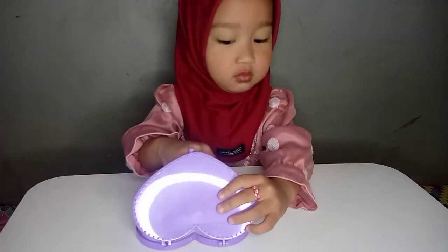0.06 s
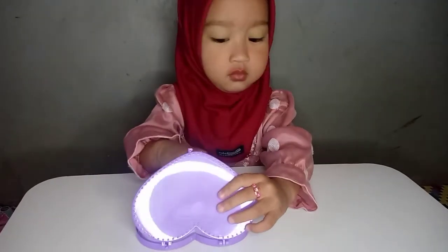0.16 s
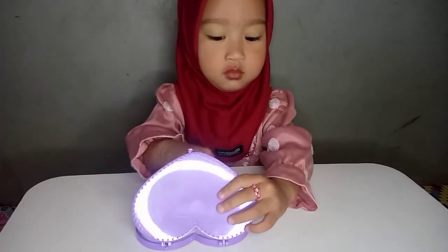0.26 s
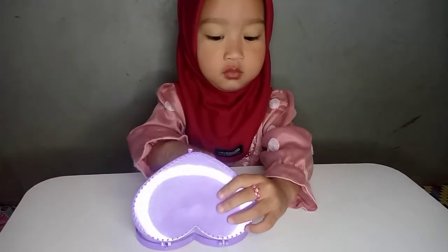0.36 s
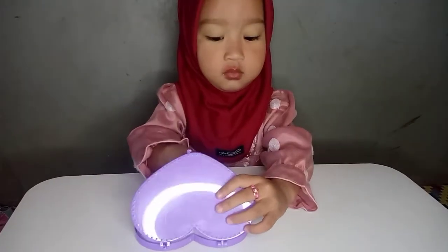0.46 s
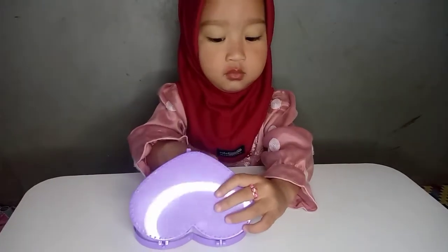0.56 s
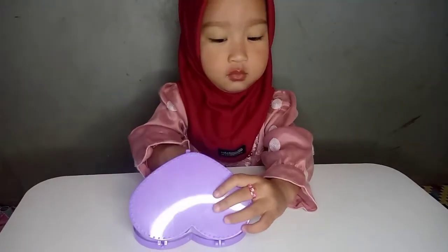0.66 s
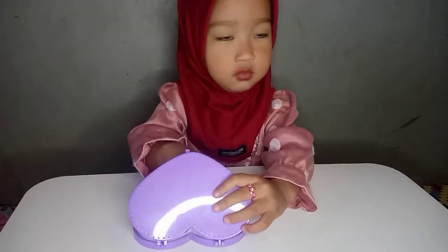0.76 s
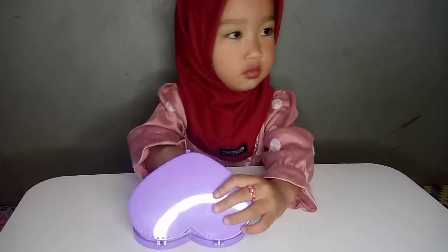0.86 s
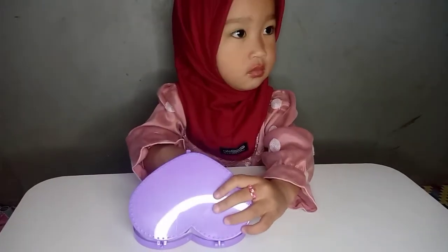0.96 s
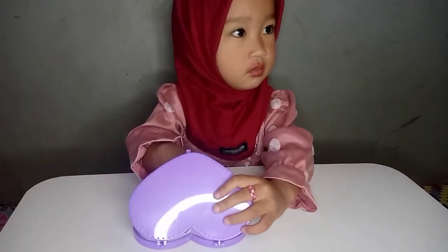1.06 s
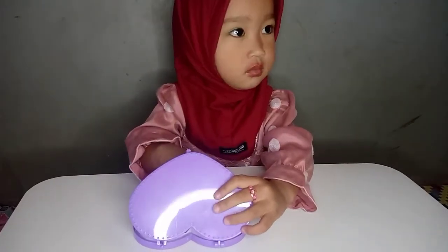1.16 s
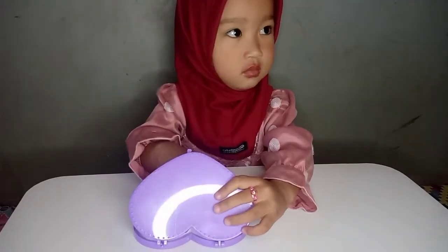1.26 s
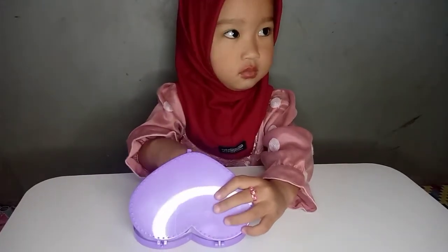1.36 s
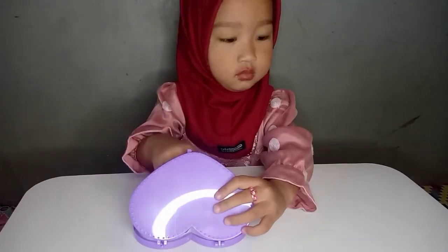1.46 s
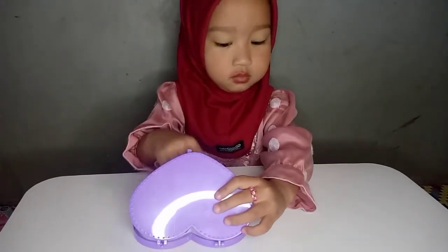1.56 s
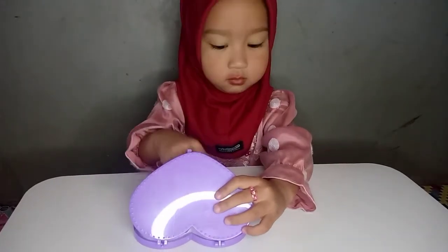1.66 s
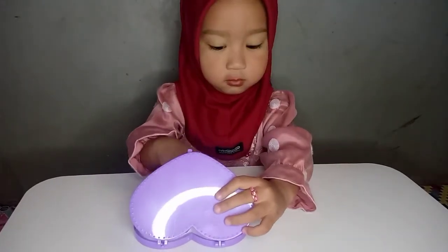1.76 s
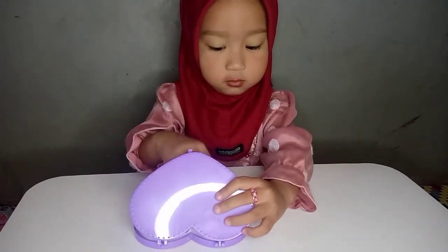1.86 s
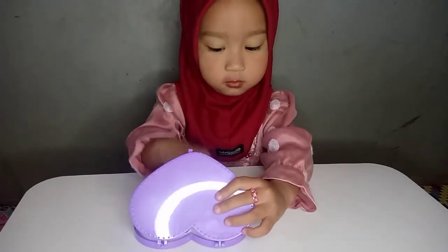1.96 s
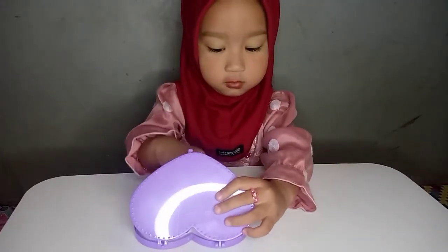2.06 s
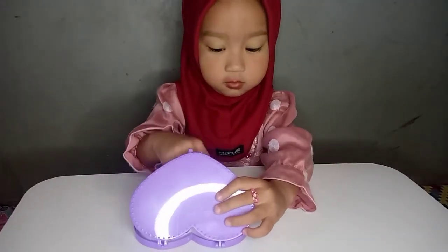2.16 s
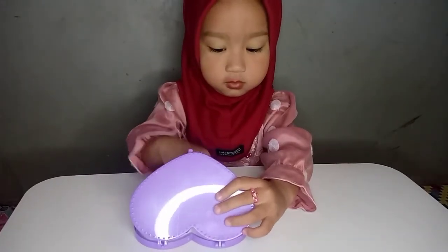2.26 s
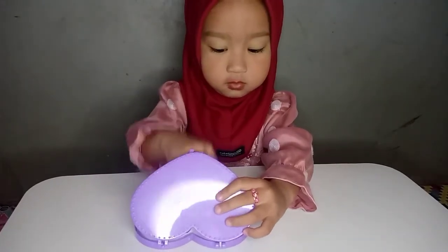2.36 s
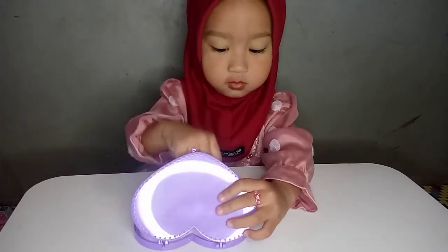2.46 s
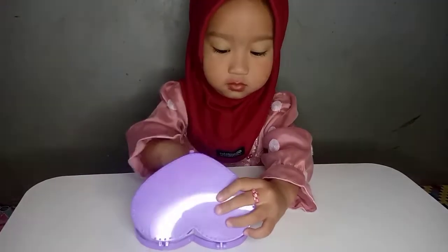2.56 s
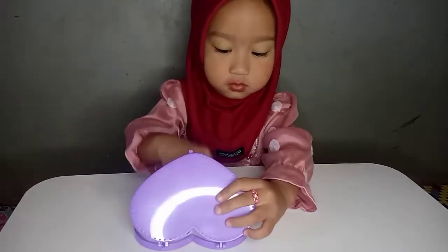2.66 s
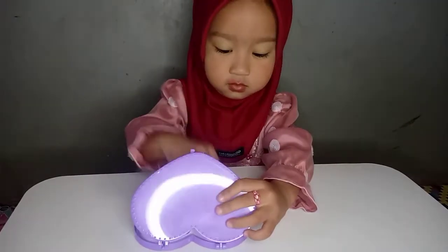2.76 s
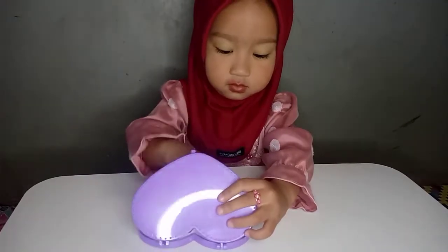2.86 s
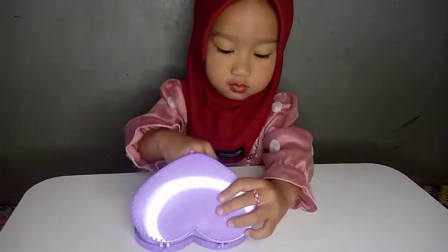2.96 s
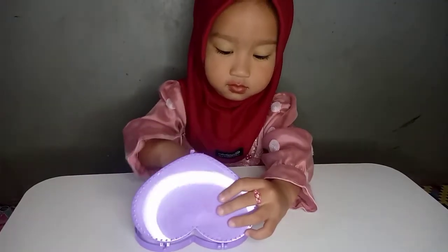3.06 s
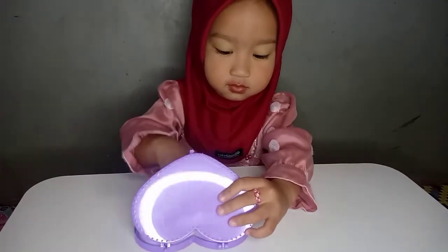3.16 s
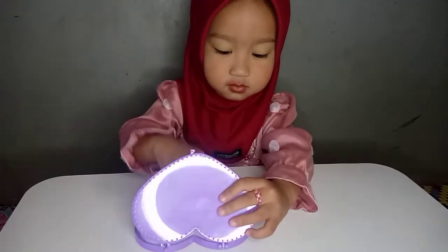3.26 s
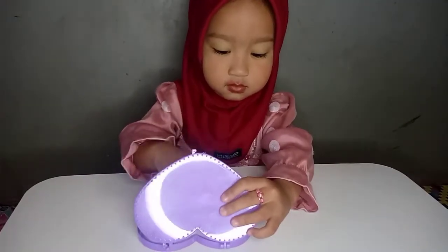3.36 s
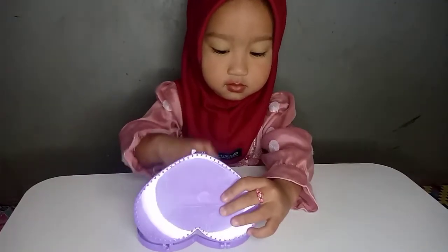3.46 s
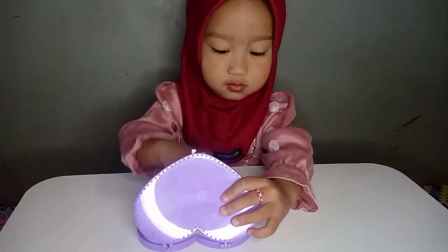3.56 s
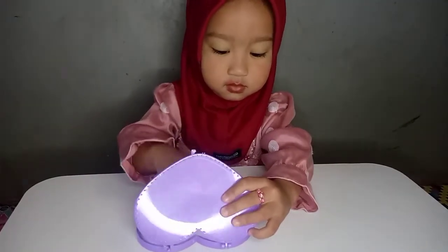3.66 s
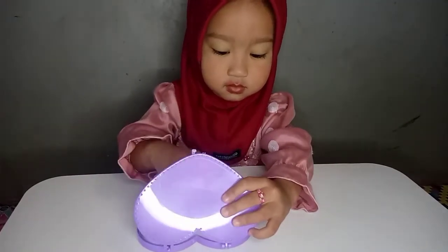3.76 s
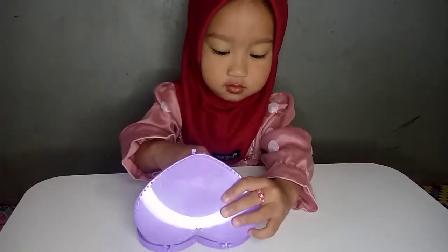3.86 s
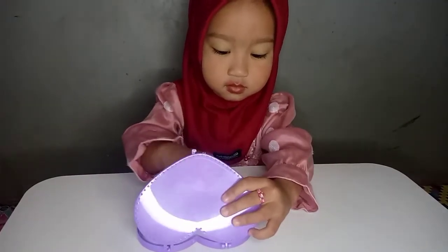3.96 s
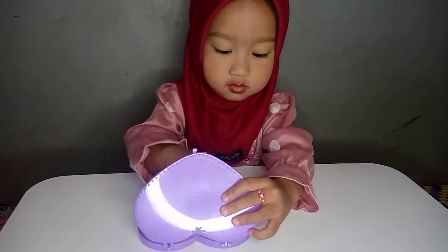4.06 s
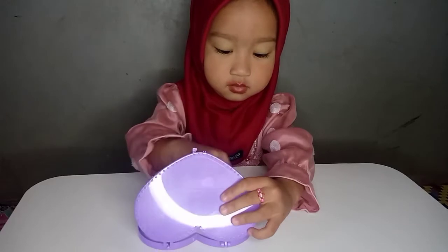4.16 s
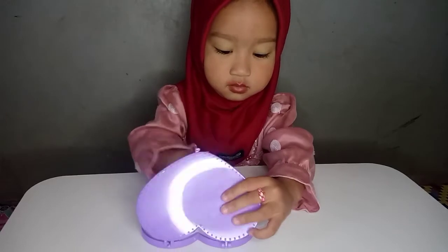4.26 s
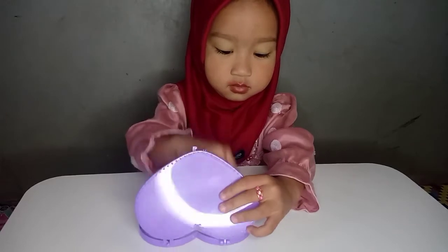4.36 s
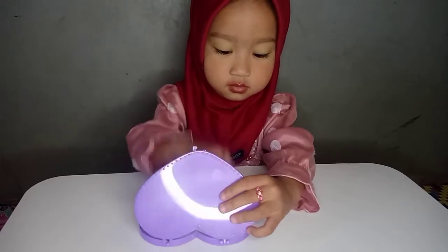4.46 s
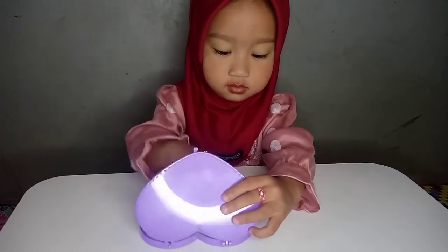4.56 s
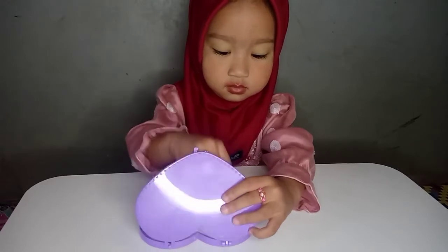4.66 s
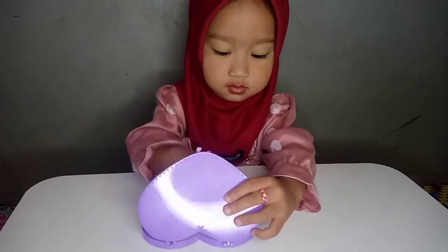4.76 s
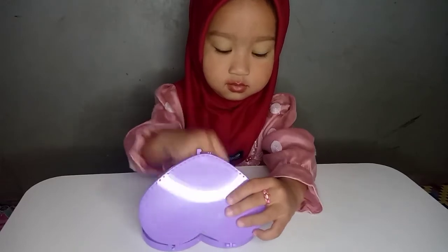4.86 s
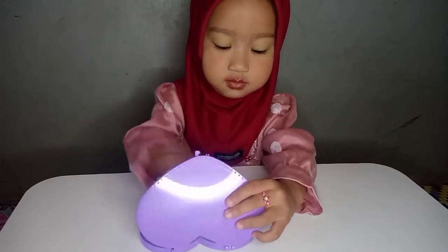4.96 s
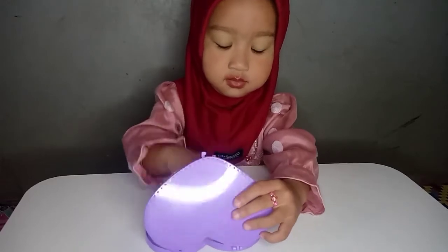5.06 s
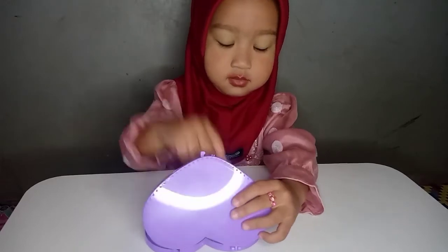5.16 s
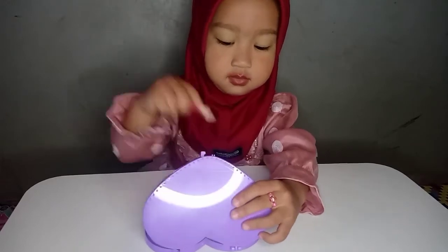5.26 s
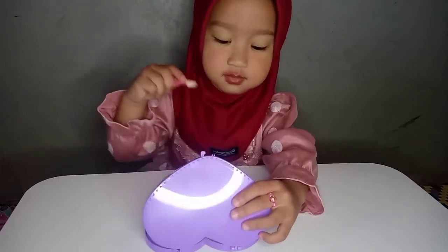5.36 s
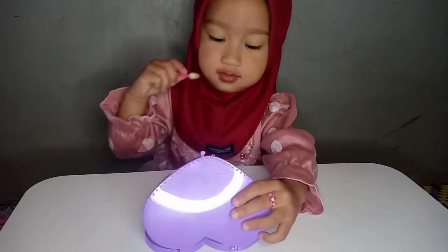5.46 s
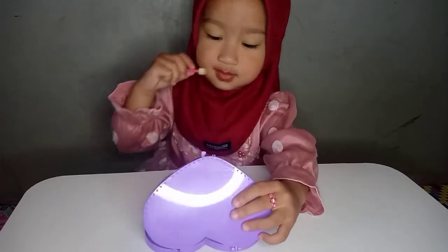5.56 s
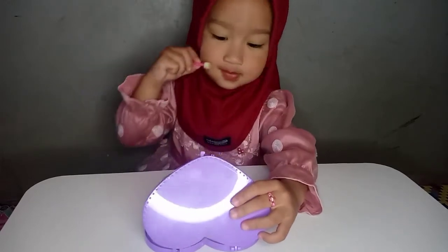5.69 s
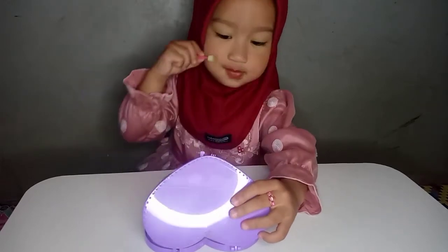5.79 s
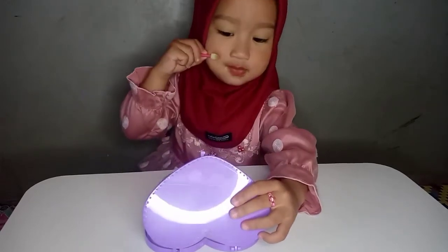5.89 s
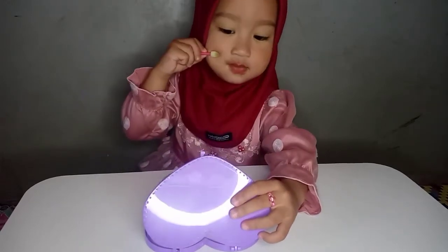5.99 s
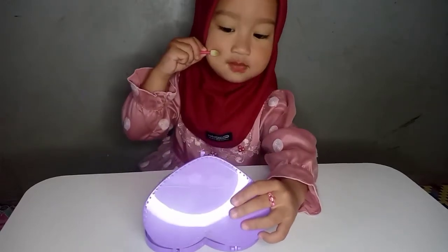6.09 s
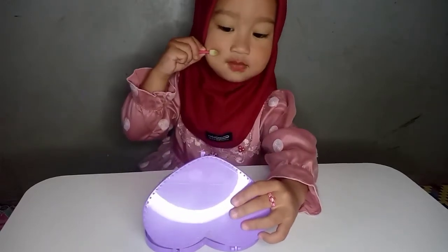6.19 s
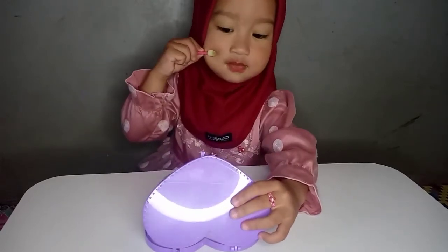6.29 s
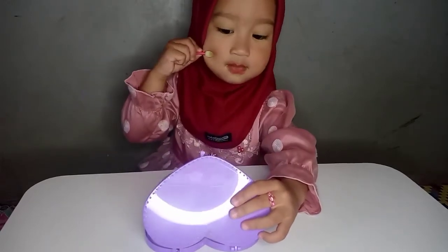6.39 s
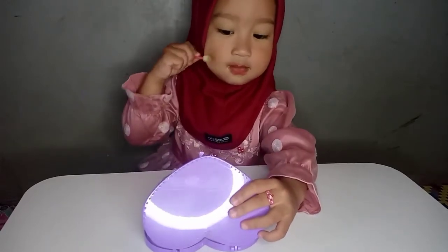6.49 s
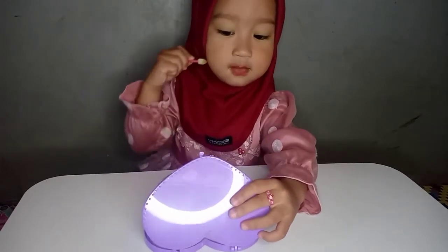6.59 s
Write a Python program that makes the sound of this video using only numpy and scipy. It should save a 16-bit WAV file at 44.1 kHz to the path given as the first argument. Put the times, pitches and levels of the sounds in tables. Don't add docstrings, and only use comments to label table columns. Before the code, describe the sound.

Close stereo pickup of hard, thin plastic being knocked and fumbled on a table top. Soft skin rubs and small clicks lead to hard bright cracks with short hollow ringing, dull rocking thuds and a scatter of loose pieces. The bursts grow denser until just after five seconds, then stop, leaving quiet room rumble, hiss and faint touches.

```python
import sys
import numpy as np
from scipy import signal
from scipy.fft import rfft, irfft, next_fast_len
from scipy.io import wavfile
from scipy.ndimage import uniform_filter1d

SR = 44100
rng = np.random.default_rng(int(sys.argv[2]) if len(sys.argv) > 2 else 0)


def pcm_store(signal):
    levels = np.round(np.clip(np.atleast_2d(signal), -1, 1) * 32767)
    wavfile.write(sys.argv[1], SR, levels.astype(np.int16).T)


N = 292383

# pitch_hz, level_db (per Hz)
FLOOR = [(20, -39.5), (45, -18), (100, 1.5), (180, -6.5), (400, -14), (800, -17.5), (1500, -21.5),
         (3000, -23.5), (5000, -31), (6200, -37.5), (8000, -39.5), (14500, -38.5), (16000, -46.5)]
# pitch_hz, likeness (0 to 1)
FLOOR_LIKENESS = [(60, 0.39), (240, 0.88), (950, 0), (3770, 0), (15000, 0.031)]
# pitch_hz, width_hz, level_db
PORT = (4600, 450, -73)
# pitch_hz, time_to_fall_60_db_s
ROOM_T60 = [(150, .3), (400, .22), (1000, .26), (2800, .3), (4800, .3), (8000, .24), (14000, .2)]
# pitch_hz, level_db
MICROPHONE = [(300, -4.5), (500, 6.5), (800, 0), (1500, -0.5), (2500, -3), (3600, 1), (4600, 1.5),
              (6000, -3), (9000, -1.5), (13000, -3.5)]
# pitch_hz, level_db
LEFT_OVER_RIGHT = [(30, 7.3), (250, 7.3), (600, 5), (1400, 5), (2800, 3), (5000, -3), (9000, 3), (14000, 1)]

# pitch_hz, level_db, time_to_fall_60_db_s
CAVITY = [(250, -9, .06), (310, -12, .04), (358, 0, .075), (378, -4, .08), (430, -8, .04)]
LID = [(700, 0, .05), (730, -2, .035), (830, -3, .03), (900, -4, .03), (990, 0, .04), (1085, -2, .04)]
PANEL = [(1180, -4, .025), (1290, 0, .03), (1335, -2, .04), (1460, -5, .025), (1600, -4, .025),
         (1820, -4, .025), (1945, -3, .035), (2200, -8, .02)]
EDGE = [(2620, -4, .012), (3000, -2, .012), (3480, 0, .015), (3750, -3, .012), (4200, -5, .01),
        (4700, -8, .008)]
# notes (as above), low_hz, high_hz,
# dense_db (crowded notes between the clear ones), spot_db (change from one struck spot to another)
PARTS = [(CAVITY, 240, 520, -7, 2.5), (LID, 540, 1100, 0, 4), (PANEL, 1100, 2400, 2, 4),
         (EDGE, 2500, 5400, 6, 4)]
# pitch_hz, level_db
CRACK = [(3000, -40), (4800, -2), (5500, 0), (6500, -6), (8000, -15), (10000, -19), (14500, -18),
         (16000, -28)]

# start_s, length_s, skin_hiss_db, shell_ring_db
STROKES = [
    (0.147, 0.066, -63.5, -78),
    (0.33, 0.11, -63.5, -84),
    (0.7, 0.33, -64.5, -61.5),
    (1.14, 0.32, -58, -98),
    (1.52, 0.14, -59, -60.5),
    (1.96, 0.044, -56.5, -59.5),
    (2.2, .04, -65, -63.5),
    (3.85, .25, -74, -80.5),
    (5.72, .08, -68.5, -78),
    (6.52, .11, -78, -80.5),
]
# pitch_hz, level_db (per Hz)
RUB_HISS = [(880, -64), (1500, -42), (1680, -30.5), (1960, 1.5), (2310, -18.5), (2780, -8), (3210, -8),
            (3430, -5), (3710, -4.5), (4540, 0.5), (5100, -8), (7350, -20.5), (15000, -56.5)]
# pitch_hz, width_hz, level_db
RUB_RING = [(250, 40, -1), (711, 40, 0), (1310, 80, -8), (1945, 45, -5)]

# start_s, panel_db
TOUCHES = [
    (0.79, -45.5),
    (0.987, -41),
    (2.424, -50),
    (2.669, -36),
    (3.722, -46.5),
    (4.585, -47),
    (4.829, -49),
    (5.87, -59),
]
# start_s, panel_db, edge_db (over panel), extra_crack_db
TICKS = [(0.3205, -60.5, 18.5, 17), (0.804, -26.5, 7, 8.5), (1.1155, -51, 13, -9), (1.152, -75, 34, 0),
         (2.13, -14, -5.5, 3), (2.4734, -34.5, -10.5, 2), (3.4762, -23, 2.5, -1.5), (4.4367, -15, -12, 0),
         (4.605, -21.5, -1, 6.5), (4.69, -9.5, -14.5, -3), (4.7698, -30.5, 4.5, -5), (4.842, -18, 1, 11.5),
         (5.086, -11.5, -1, 5.5), (5.7516, -63, 25, -5), (5.7892, -77, 2, -3), (6.571, -58, 14.5, -8)]
# start_s, panel_db, edge_db (over panel)
RATTLES = [(1.262, -47, 3.5), (2.104, -57.5, 12.5), (2.4491, -34, 7.5), (2.69, -22, -2.5),
           (3.1891, -38.5, 3), (3.448, -28, 1), (3.7759, -33.5, -3.5), (4.1837, -42.5, 7.5), (4.4, -27, 4),
           (4.6095, -23.5, 6), (4.8488, -31.5, -2.5)]
# cavity_db, lid_db, thump_db
THUDS = [(0.748, -41.5, -30, -5.5, -33), (0.8093, -32.5, -2.5, -1.5, 0), (0.866, -53.5, 8, -33, -4),
         (1.039, -42.5, 0, -22, -6.5), (1.051, -41.5, 7, 3, -16), (2.7076, -27, -22.5, -3.5, -25),
         (2.82, -30, 1.5, -15.5, -14), (2.945, -33, 0, -12, 3.5), (2.978, -31.5, -31.5, -12.5, -25),
         (3.026, -25.5, -20, -7.5, -24), (3.259, -26.5, -10.5, -10, -20),
         (4.3602, -13.5, -9.5, -23.5, -23.5), (4.6367, -19, -3, -9.5, -20), (4.85, -29, 4, -6.5, 2.5),
         (4.998, -26, -0.5, -5.5, -15.5), (5.051, -35.5, 4, 0.5, -9), (5.1341, -25, -19, -2, -11),
         (5.1866, -40.5, 0, 8, -4.5)]
# cavity_db, lid_db, edge_db
BLOWS = [(0.0014, -31.5, -12, -13.5, -6), (0.685, -43, -22, -37, -6), (0.7978, -19.5, -9, -18, -4.5),
         (0.9952, -23.5, 3.5, -5.5, -1), (2.126, -22.5, -9.5, -3, 3), (2.4313, -23, -14, -8.5, -5),
         (2.507, -26, -1.5, -9, -4), (2.6312, -48.5, -2.5, -15.5, 18), (2.6739, -6, -31.5, -9.5, 5.5),
         (2.8731, -12, -23.5, -15.5, -1.5), (2.9284, -14.5, -3, -1, 0.5), (2.9402, -6.5, -11, -27, -1.5),
         (3.2018, -20.5, -11, -7.5, 3.5), (3.433, -29.5, -3.5, -17, 1.5), (3.7287, -23, -6.5, -20.5, 0.5),
         (4.152, -28.5, -35, -45, -5), (4.346, -13.5, -25.5, -3.5, 0), (4.6023, -6, -10, -19, -8.5),
         (4.6783, -10.5, -27.5, -8.5, -2.5), (4.8393, -6, -10.5, -12, -6.5),
         (4.912, -9.5, -10, -16.5, -2.5), (5.0825, -10, -22.5, -4.5, -3.5),
         (5.0938, -5.5, -7.5, -15.5, 1.5), (5.175, -10.5, -9, -26, -2)]

CRACK_DB, THUMP_DB = -5, -20
QUICK_RISE, SLOW_RISE = 0.13, 0.55


def from_db(db):
    return 10 ** (np.asarray(db) / 20)


def rms_one(x):
    return x / np.sqrt(np.mean(x ** 2) + 1e-20)


def peak_one(rows):
    return rows / np.abs(rows).max(axis=-1, keepdims=True)


def at_hz(points, hz):
    table_hz, values = np.transpose(points)
    return np.interp(np.log(hz + 1), np.log(table_hz + 1), values)


def colour(x, spectrum):
    size = x.shape[-1]
    hz = np.fft.rfftfreq(size, 1 / SR)
    return irfft(rfft(x) * from_db(at_hz(spectrum, hz)), size)


def passed(x, hz, kind, order):
    return signal.sosfilt(signal.butter(order, hz, kind, fs=SR, output="sos"), x)


def ring(force, hz, t60):
    decay = from_db(-60 / (t60 * SR))
    turn = 2 * np.pi * hz / SR
    return signal.lfilter([0, np.sin(turn)], [1, -2 * decay * np.cos(turn), decay ** 2], force + 1e-18)


def t60_of(width_hz):
    return np.log(1000) / np.pi / width_hz


def flicker(rate_hz):
    r = np.exp(-2 * np.pi * rate_hz / SR)
    wander = signal.lfilter([1], [1, -2 * r, r * r], rng.standard_normal(N + SR))
    return rms_one(wander[SR:])


def pair(likeness, size):
    mid, side = rfft(rng.standard_normal((2, size)))
    alike = np.clip(likeness, 0, 1)
    return irfft(np.sqrt(1 + alike) * mid + np.sqrt(1 - alike) * side * [[1], [-1]], size)


def background():
    hz = np.fft.rfftfreq(N + 1, 1 / SR)
    noise = pair(at_hz(FLOOR_LIKENESS, hz), N + 1)
    port_hz, width_hz, port_db = PORT
    t60 = t60_of(width_hz)
    port = rms_one(ring(ring(noise, port_hz, t60), port_hz, t60))[:, :N]
    port = port * from_db(port_db + 2.0 * flicker(4.0))
    rumble = from_db(-63.5) * rms_one(colour(noise, FLOOR))[:, :N]
    return (rumble + port) * from_db(1.0 * flicker(8.4))


def room(x):
    onset_s, level_db = 0.0072, -6.5
    size = SR // 2
    t = np.arange(size) / SR
    noise = pair(0.094, size)
    tail = 0
    for hz in 125 * 2 ** np.arange(8):
        band = passed(noise, [hz / np.sqrt(2), min(hz * np.sqrt(2), SR / 2.2)], "band", order=2)
        tail = -tail + band * from_db(-60 * t / at_hz(ROOM_T60, hz))
    echoes = rfft(tail * (1 - np.exp(-t / onset_s)))
    evened = echoes / np.sqrt(uniform_filter1d(np.abs(echoes) ** 2, size=60) + 1e-9)
    tail = irfft(evened, size) * np.minimum(1, 20 - 20 * t / t[-1])
    return from_db(level_db) * signal.fftconvolve(x[None], tail, axes=1)[:, :N]


def rubbing():
    attack_s, release_s = 0.023, 0.05
    t = np.arange(N) / SR
    hiss_gain, ring_gain = np.zeros((2, N))
    for start, length, hiss_db, ring_db in STROKES:
        swell = np.minimum(0, (t - start) / attack_s)
        release = np.minimum(0, (start + length - t) / release_s)
        pressure = np.exp(swell + release)
        hiss_gain += from_db(hiss_db) * pressure
        ring_gain += from_db(ring_db) * pressure
    grains = pair(0.13, N + 1)[:, :N] * from_db(2.0 * flicker(60.0))
    shell = 0
    for hz, width_hz, db in RUB_RING:
        note = rms_one(ring(grains, hz, t60_of(width_hz)))
        shell = shell + from_db(db + 3.0 * flicker(5.8)) * note
    return hiss_gain * rms_one(colour(grains, RUB_HISS)) + ring_gain * rms_one(shell)



def touches():
    return [(s, db, -15.5, -3.5, -6.5, 0.0019, SLOW_RISE, CRACK_DB, THUMP_DB) for s, db in TOUCHES]


def ticks():
    return [(s, db, -15, -12.5, edge_db, 0.0025, QUICK_RISE, CRACK_DB + extra_db, THUMP_DB)
            for s, db, edge_db, extra_db in TICKS]


def rattles():
    start_s, gap_s, first_db, loss_db = 2.686, 0.017, -24.5, 1.5
    shower = [(start_s + k * gap_s, first_db - k * loss_db, 9.5) for k in range(6)]
    return [(s, db, -6.5, -12.5, edge_db, 0.024, QUICK_RISE, -10.5, THUMP_DB)
            for s, db, edge_db in RATTLES + shower]


def thuds():
    return [(s, db, cavity_db, lid_db, -11, 0.0098, SLOW_RISE, CRACK_DB, thump_db)
            for s, db, cavity_db, lid_db, thump_db in THUDS]


def blows():
    rows = []
    for s, db, cavity_db, lid_db, edge_db in BLOWS:
        chatter_s = 0.011 * np.exp(-0.0378 * (db + 20))
        rows.append((s, db, cavity_db, lid_db, edge_db, chatter_s, QUICK_RISE,
                     CRACK_DB, THUMP_DB + cavity_db / 2))
    return rows


def chatter(chatter_s, rise, size):
    contacts_per_s, flipped_share = 3500, 0.22
    tail_db, tail_stretch = -24, 4.8
    t = np.arange(size) / SR
    hit, sign, height, facing = rng.random((4, len(chatter_s), size))
    contacts = (hit < contacts_per_s / SR) * np.sign(sign - 0.5) * from_db(-4.3 * np.log(height + 0.033))
    swell = (1 - np.exp(-t / (rise * chatter_s))) ** 2
    fading = np.exp(-t / chatter_s) + from_db(tail_db) * np.exp(-t / (tail_stretch * chatter_s))
    force = peak_one(contacts * swell * fading)
    flips = np.sign(facing - flipped_share)
    return force, force * np.array([np.ones_like(force), flips])


def shell_part(force, sided, panel_db, part):
    modes, low_hz, high_hz, dense_db, spot_db = part
    count = len(force)
    high_part = low_hz > 2000
    spot, tilt = rng.standard_normal((2, len(modes), count, 1))
    lean_db = 13 * low_hz / 2400 * np.array([1, -1])[:, None, None]
    clear = 0
    for k, (hz, db, t60) in enumerate(modes):
        clear = clear + from_db(db + spot_db * spot[k] + lean_db * tilt[k]) * ring(force, hz, t60)
    clear = clear / np.std(clear, axis=(0, 2), keepdims=True)
    if not high_part:
        dense_db = dense_db + 0.54 * (panel_db + 13)
    dense = (sided if high_part else force) / np.std(force, axis=1, keepdims=True)
    dense = from_db(dense_db) * dense * np.sqrt(SR / 4 / (high_hz - low_hz))
    sound = passed(clear + dense, [low_hz, high_hz], "band", order=2)
    return sound / np.abs(sound).max(axis=(0, 2), keepdims=True)


def knocks():
    rows = blows() + thuds() + rattles() + ticks() + touches()
    columns = np.transpose(rows)[:, :, None]
    start, panel_db, cavity_db, lid_db, edge_db, chatter_s, rise, crack_db, thump_db = columns
    size = SR // 6
    force, sided = chatter(chatter_s, rise, size)
    sound = 0
    for part, part_db in zip(PARTS, (cavity_db, lid_db, 0, edge_db)):
        sound = -sound + from_db(panel_db + part_db) * shell_part(force, sided, panel_db, part)
    sound = passed(sound, 5500, "low", order=4)
    sound = passed(sound, 240, "high", order=3)
    hardness_db = -4.5 * np.log(chatter_s / 0.0074)
    sound += from_db(panel_db + edge_db + crack_db + hardness_db) * colour(sided, CRACK)
    thump = peak_one(passed(force, [130, 270], "band", order=2))
    sound += from_db(panel_db + thump_db) * thump
    push = peak_one(passed(np.abs(force), [65, 125], "band", order=2))
    sound += from_db(panel_db - 35) * push
    out = np.zeros((2, N + size))
    for k, at in enumerate(np.round(start[:, 0] * SR).astype(int)):
        out[:, at:at + size] += sound[:, k]
    return out[:, :N]


def scene():
    case = colour(knocks() + rubbing(), MICROPHONE)
    return case + room(case.mean(axis=0)) + background()


def low_pass(x):
    return signal.sosfilt(signal.butter(12, 16320, fs=SR, output="sos"), x)


def record(dry):
    left_lag_s = 0.00009
    size = next_fast_len(N + 2048)
    hz = np.fft.rfftfreq(size, 1 / SR)
    half = from_db(at_hz(LEFT_OVER_RIGHT, hz) / 2)
    ports = np.array([half * np.exp(-2j * np.pi * hz * left_lag_s), 1 / half])
    x = irfft(rfft(dry, size) * ports, size)[:, :N]
    x = 1.177 * np.tanh(x / 1.24)
    return low_pass(passed(x, 15900, "low", order=16))


dry = scene()
out = record(dry)
pcm_store(out)
```